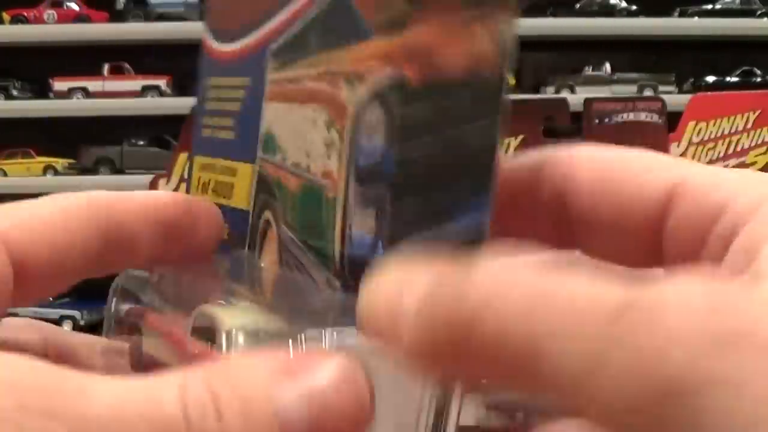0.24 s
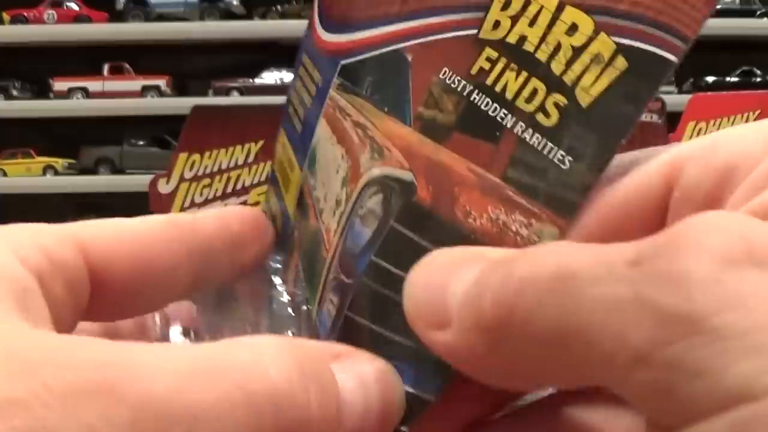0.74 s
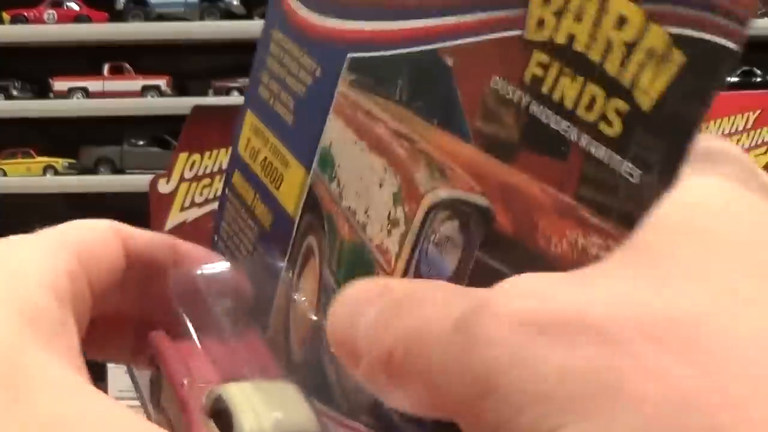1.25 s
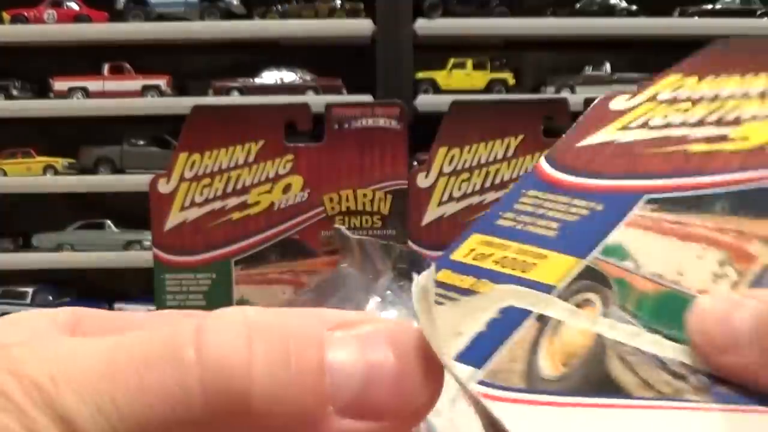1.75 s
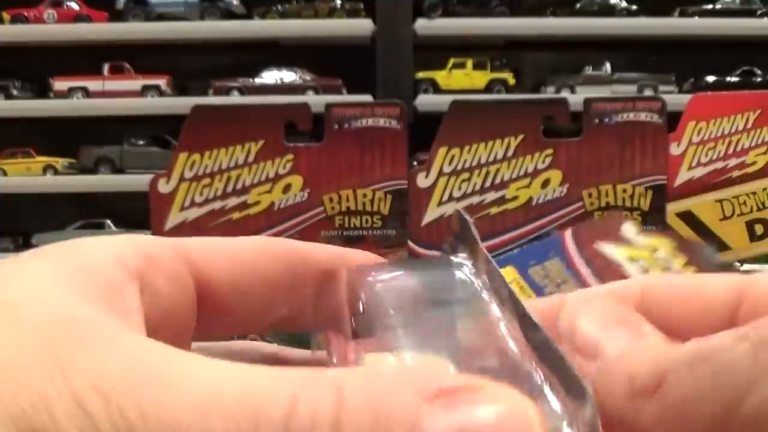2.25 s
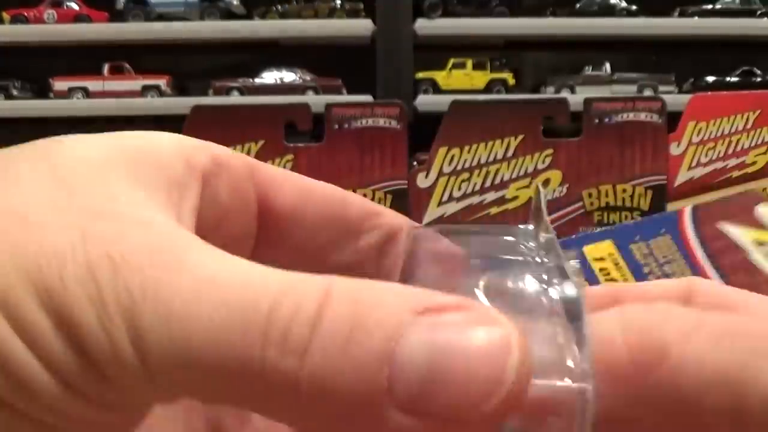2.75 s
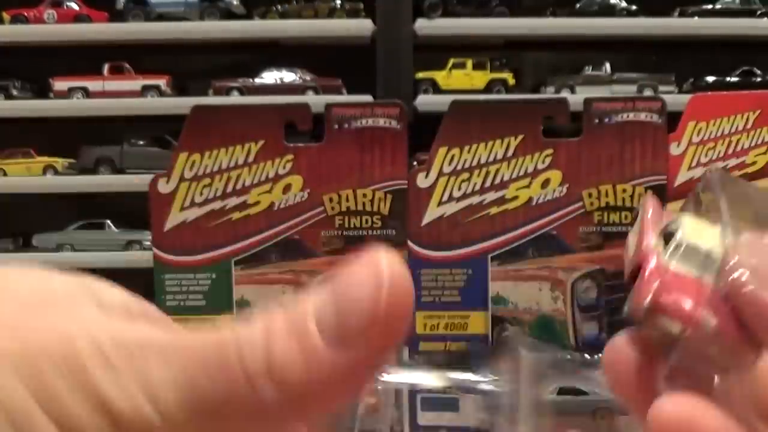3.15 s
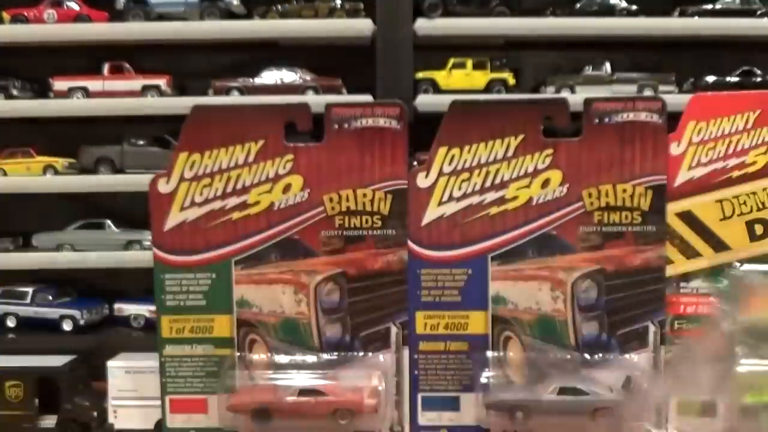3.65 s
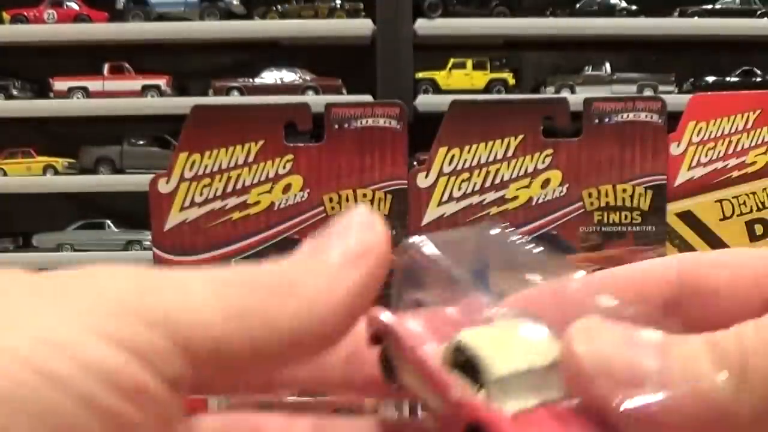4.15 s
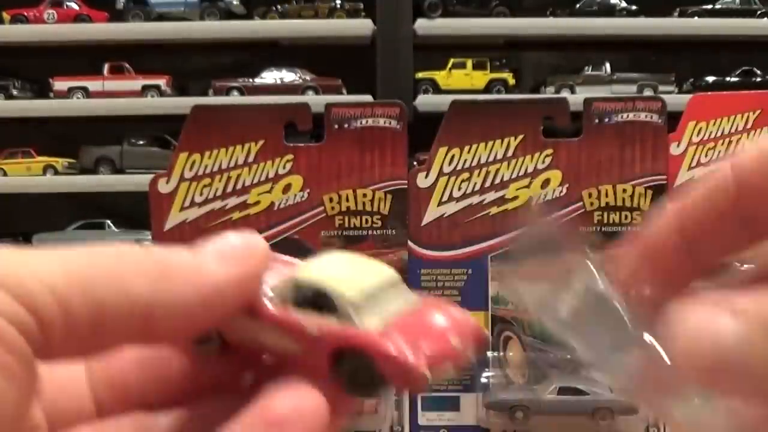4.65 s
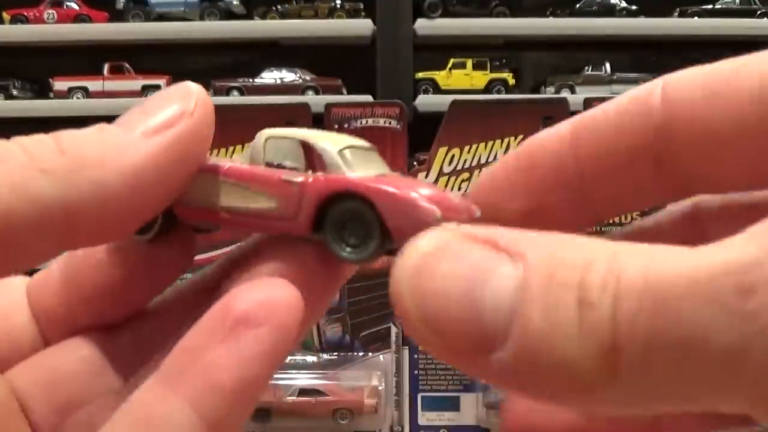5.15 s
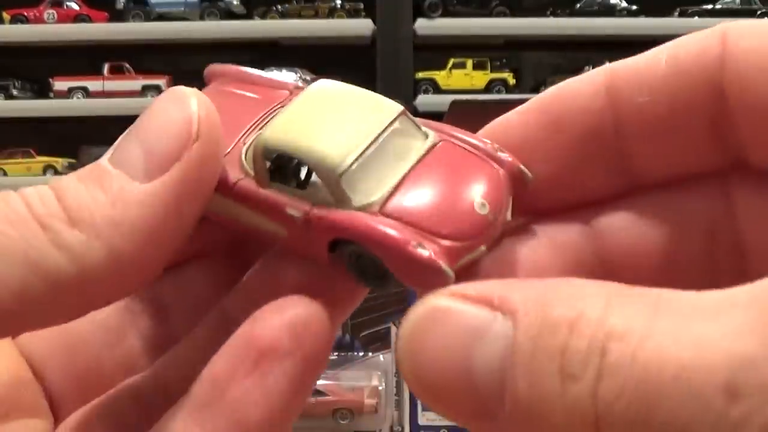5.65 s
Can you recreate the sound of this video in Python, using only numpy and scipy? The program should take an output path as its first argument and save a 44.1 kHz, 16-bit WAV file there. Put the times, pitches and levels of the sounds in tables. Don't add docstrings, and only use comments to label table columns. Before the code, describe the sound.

A plastic blister pack is opened very near the microphone. Soft clicks and ratcheting creaks grow into sharp snaps and a quick tearing burst, then irregular bright crackles and hollow plastic knocks. After a brief lull with tiny metallic ticks, a light plastic tray drops, bounces and rattles to rest. The room is dry, with faint hiss and no speech.

```python
import sys
import numpy as np
from scipy import signal
from scipy.fft import rfft, irfft
from scipy.io import wavfile
from scipy.ndimage import uniform_filter1d

SR = 44100
rng = np.random.default_rng(int(sys.argv[2]) if len(sys.argv) > 2 else 0)


def voltage_ratio(level):
    return 10 ** (np.asarray(level, float) / 20)


def store_pcm(level_fs):
    pcm = np.round(np.clip(level_fs, -1, 1) * 32767).astype(np.int16)
    wavfile.write(sys.argv[1], SR, np.atleast_2d(pcm).T)


N = 260120

# (time [s], peak
# level [dB], treble share [dB])
SNAPS = [(0.1252, -13, -11), (0.2, -16.5, -17), (0.2392, -26, -13), (0.434, -24, -14),
         (0.5433, -14.5, -17), (0.562, -27, 0.5), (0.581, -20.5, -7), (0.5957, -18, -7),
         (0.744, -24, -19), (0.9548, -23.5, 10), (0.9849, -2, -1.5), (1.056, -26, -6),
         (1.0782, -8, -4), (1.1389, -1.5, -1.5), (1.3929, -4.5, -4.5), (1.4104, -12, -10),
         (1.5154, -10, -13), (1.749, -7, -12), (1.7737, -11, -23), (1.8428, -2, 8),
         (1.862, -2.5, -15), (1.8957, -1.5, 15), (1.917, -7, -37), (1.937, -4, -5.5),
         (2.015, -8, -11), (2.063, -15.5, -9), (2.1045, -6.5, -35), (2.1427, -11.5, -4.5),
              (2.264, -1.5, -1), (2.4234, -7, -24), (2.492, -13, 0), (2.606, -9, -20), (2.643, -17.5, -13),
              (2.6957, -9, 0), (2.765, -10.5, -1.5), (2.8505, -8, -7), (2.9196, -4.5, 0.5), (2.9259, -3, 1),
              (2.964, -7.5, -18), (3.13, -1, -7), (3.1494, -10, -5), (3.176, -9, -1.5), (3.262, -9, 3),
              (3.3595, -6.5, 1.5), (3.38, -23, -22), (3.449, -10.5, -3.5), (3.497, -8, -2),
         (3.6244, -31, 6), (3.649, -4, 5), (3.673, -6, 3), (3.714, -7.5, -2), (3.783, -8, -1.5),
              (3.867, -4, -21), (3.936, -7, -12), (3.956, -13, -14), (3.98, -9, -5.5), (4.01, -11.5, -7),
              (4.028, -9.5, -18), (4.0759, -15.5, -7), (4.198, -27, -24), (4.232, -14.5, -23),
              (4.2468, -18, -27), (4.707, -20, -19), (4.7652, -22, -14), (4.807, -2, -13.5),
              (4.9048, -17, -6), (4.959, -17.5, -19), (4.973, -12.5, -9.5), (5.0795, -5, -5),
              (5.2345, -17.5, 0.5)]
# (time [s], peak level [dB])
SEAM_TICKS = [(1.4204, -20), (1.4248, -27), (1.43, -1), (1.44, -5), (1.451, -1), (1.458, -6.5),
              (1.465, -1.5), (1.4695, -20), (1.4735, 1), (1.484, -7.5), (1.4896, -4), (1.513, -5),
              (1.5474, -5), (1.5523, -10), (1.5582, -5), (1.5694, -5), (1.5745, -5), (1.5797, -12),
              (1.586, -7), (1.6097, -5), (1.6147, -4), (1.626, -12), (1.6344, -10), (1.642, -3),
              (1.647, -9), (1.654, -4), (1.663, -4), (1.6744, -8), (1.683, -5), (1.692, -11), (1.6966, -6),
              (1.7047, -7), (1.7147, -8), (1.7244, -35), (1.737, -13)]
SNAP_T60_S, SEAM_T60_S = 0.021, 0.006
TAUT_FOLD_HZ, LOOSE_FOLD_HZ, LOOSE_S = 4670, 3170, 0.9

# (time [s], peak level [dB], panel pitch [Hz])
SHELL_POPS = [(0.123, -17.5, 830), (0.239, -16, 667), (0.269, -26, 730), (0.6, -15, 723), (0.976, -12, 787),
              (1.07, -11.5, 680), (1.299, -20.5, 1140), (1.324, -16.5, 598), (1.3913, -8, 1800),
              (1.422, -11, 720), (1.471, -14, 735), (1.528, -11.5, 670), (1.663, -16, 690),
              (1.686, -14, 630), (1.747, -18.5, 710), (1.768, -17, 690), (1.791, -22, 615),
              (1.717, -4, 624), (1.844, -12, 680), (1.884, -16.5, 619), (1.919, -19.5, 713),
              (1.939, -17.5, 750), (2.015, -23, 1270), (2.065, -17, 610), (2.105, -12, 552),
              (2.42, -13.5, 830), (2.562, -20, 706), (2.608, -14.5, 1470), (2.694, -17, 690),
              (2.762, -14, 683), (2.869, -17.5, 1340), (2.961, -18.5, 667), (3.058, -24.5, 620)]
# (time [s], peak level [dB], panel pitch [Hz])
TRAY_POPS = [(3.152, -13.5, 1120), (3.178, -18, 1610), (3.228, -15, 1120), (3.237, -4, 1120),
             (3.266, -12, 1110), (3.284, -13.5, 1130), (3.33, -16.5, 1000), (3.35, -11, 616),
             (3.621, -19.5, 1314), (3.709, -23, 1360), (3.799, -4.5, 1422), (3.819, -12, 590),
             (3.869, -8, 1320), (3.956, -9.5, 540), (4.078, -13.5, 1486), (4.136, -14.5, 1430),
             (4.197, -28, 1540), (4.806, -7, 1520), (4.866, -20, 575), (4.9049, -7, 1112),
             (4.972, -9.5, 1424), (5.08, -6.5, 1270), (5.129, -17.5, 1500), (5.547, -45.5, 512)]
POP_T60_S, POP_PITCH_LAW, POP_STRENGTH_LAW = 0.064, 0.0034, 0.11
TRAY_S = 3.15

# (time [s], peak level [dB], crease pitch [Hz])
PULL_CREASES = [(1.7667, -15, 3750), (1.7725, -19, 3000), (1.7826, -13, 3120), (1.79, -7, 4130),
                (1.7995, -10, 3880), (1.8173, -15, 3770), (1.827, -7.5, 3190), (1.8333, -8, 4130),
                (1.8426, -7, 2900), (1.863, -13, 3020), (1.882, -16, 2780), (1.8956, -5, 2480),
                (1.9193, -5, 3250), (1.939, -14, 2350), (2.0141, -0.5, 3180), (2.0628, -10, 3400),
                (2.1043, -15, 4680), (2.1438, -11.5, 4330), (2.244, -19, 5660), (2.264, -9.5, 4300),
                (2.337, -19.5, 3230), (2.425, -8.5, 2320), (2.4467, -14, 4200), (2.492, -16, 3650),
                (2.505, -15, 2270), (2.573, -12, 3100), (2.6082, -0.5, 3100), (2.642, -12, 3560),
                (2.6968, -12, 4030), (2.7644, -17, 2420), (2.7996, -7, 3120), (2.8257, -12.5, 2800),
                (2.8516, -12, 2960), (2.922, -9.5, 3700), (2.9646, -11, 3600), (2.9833, -10, 2950),
                (3.075, -19.5, 3030), (3.0916, -14, 2980), (3.118, -15, 3340), (3.1305, -22, 3460),
                (3.1789, -3.5, 3500)]
# (time [s], peak level [dB], crease pitch [Hz])
TRAY_CREASES = [(3.231, -26, 1380), (3.2622, -10, 4000), (3.2994, -14, 1400), (3.3334, -10.5, 1430),
                (3.354, -9.5, 1960), (3.376, -17, 1650), (3.3916, -10.5, 1990), (3.4492, -19, 2530),
                (3.4576, -14, 3060), (3.4985, -16, 5400), (3.625, -5.5, 2865), (3.6516, -11.5, 2590),
                (3.6776, -7, 3170), (3.708, -21, 1800), (3.7602, -13, 1580), (3.774, -12, 1500),
                (3.784, -5.5, 1370), (3.802, -6.5, 1424), (3.8213, -5.5, 1880), (3.835, -5, 1660),
                (3.852, -5.5, 1620), (3.8683, -23, 1520), (3.9047, -14, 1600), (3.9368, -10.5, 3140),
                (3.9601, -7, 1990), (3.972, -15, 1360), (3.987, -16, 1720), (4.0115, -12, 1400),
                (4.0271, -11, 4760), (4.052, -12, 5870), (4.08, -24, 1550), (4.1414, -19, 1380),
                (4.1973, -13.5, 2630), (4.2129, -17, 1580), (4.231, -7, 2620), (4.2477, -16.5, 1530),]
# (time [s], peak level [dB], pitch [Hz])
BOUNCES = [(4.809, -1, 2700), (4.8143, -4, 2670), (4.8218, -2, 2720), (4.8326, -4, 1017),
           (4.8436, -4.5, 1640), (4.867, -12, 910), (4.8737, -14, 930), (4.9068, -4.5, 1740),
           (4.911, -7, 1080), (4.9202, -9.5, 2600), (4.9345, -43.5, 2710), (4.9593, -21, 950),
           (4.9757, -13, 1496), (5.081, -18, 1210), (5.087, -26, 1260), (5.132, -25, 1470),
           (5.1436, -19, 2280)]
CREASE_CYCLES, CREASE_LONGEST_S, CREASE_DB = 54, 0.04, -2

# (frequency [Hz], response [dB])
FIBRES = [(2940, -41.5), (5000, -8), (6710, -2), (8840, 8.5), (10200, 9.5), (12200, -8.5), (16000, -13.5),
          (17000, -63)]
# (frequency [Hz], response [dB])
SHEET = [(940, -33.5), (1600, -2), (1860, -4.5), (2040, -21.5), (2890, -1.5), (5020, -6), (7000, -11),
         (9100, -7.5), (15400, -120)]
# (frequency [Hz], response [dB])
SHELL = [(120, -34), (200, -17), (455, -12.5), (628, -1.5), (831, -11), (1070, -5), (1210, -9.5),
         (2400, -13), (3300, -39.5), (6000, -67)]
# (frequency [Hz], response [dB])
TRAY = [(120, -53.5), (200, -10.5), (432, -7), (548, 4), (831, -1.5), (1200, -4), (1340, 1.5), (2400, -6),
        (3300, -34), (6000, -64)]
# (frequency [Hz], response [dB])
BUMPS = [(15, -49.5), (25, -18), (80, -12), (165, -4.5), (330, -4), (430, -16), (660, -92)]
# (time [s], crackle level [dB], brightness [dB])
STRAIN = [(0, -62, -16), (.33, -66, 1), (.5, -52.5, -7), (.82, -50, -0.5), (.93, -42.5, 14.5),
          (1.05, -43.5, -3), (1.28, -43, 3.5), (1.6, -34.5, -3), (1.93, -31.5, 4), (2.03, -48, 0),
          (2.5, -35.5, -5), (3.03, -46.5, -2.5), (3.42, -47, -3), (3.7, -39.5, 3.5), (3.95, -33.5, -17),
          (4.19, -53, -19), (4.55, -60.5, 2), (5.39, -66.5, -4.5)]
# (start [s], hold [s], level [dB], brightness [dB])
SQUEEZES = [(0.134, 0.024, -52, 6), (0.194, 0.06, -46, -5), (0.436, 0.035, -54, 16),
            (0.707, 0.043, -62, 30), (0.966, 0.0056, -25, 9.5), (1.126, 0.032, -34, 6),
            (1.42, 0.19, -29, 10.5), (1.519, 0.062, -25.5, -4.5), (1.724, 0.087, -32, 14),
            (2.093, 0.067, -39, -11.5), (2.27, 0.15, -51.5, 18), (2.422, 0.0072, -25, 7),
            (2.562, 0.057, -35.5, 5), (2.785, 0.042, -44.5, 9.5), (2.903, 0.0059, -32, -6),
            (2.975, 0.015, -33.5, -13), (3.063, 0.13, -41, -10), (3.241, 0.066, -32, -3),
            (3.364, 0.029, -28.5, -1.5), (3.618, 0.027, -34, 4), (3.781, 0.055, -30, 5),
            (4.212, 0.022, -37, -7), (4.328, 0.046, -50, 4), (4.71, 0.031, -50, -7),
            (3.66, 0.0049, -36, -2), (0.66, 0.01, -44, 8), (1.344, 0.052, -35, -5.5),
            (4.113, 0.027, -35, -18), (5.119, 0.056, -56, 5)]
# (start [s], hold [s], level [dB], brightness [dB])
DROPS = [
    (4.809, 0.0053, -24, -12.5),
    (4.902, 0.0063, -40, -17),
    (4.963, 0.048, -41, -14),
    (5.076, 0.031, -39, -21.5),
]
SWELL_DB_PER_S, DROP_DB_PER_S = 606.5, 9000
FIBRE_FADE_DB_PER_S, SHEET_FADE_DB_PER_S, SHELL_FADE_DB_PER_S = 343, 287, 230.5
# (middle [s], half length [s], depth [dB])
LULLS = [
    (0.685, 0.016, -13),
    (2.216, 0.022, -9.5),
    (2.397, 0.033, -12.5),
    (2.73, 0.03, -6.5),
    (3.041, 0.035, -10),
    (3.61, 0.012, -5),
    (4.323, 0.021, -5.5),
    (4.8, 0.0097, -7),
]
# (time [s], gain [dB])
SHEET_SHARE = [
    (.45, 6),
    (.6, -4),
    (.9, -10),
    (1.3, 0.5),
    (4.25, 2.6),
    (4.35, 6),
    (4.75, 6.5),
    (4.8, 5.5),
]
# (time [s], bump level [dB])
GRIP = [(0, -73), (0.12, -48), (0.14, -34), (0.22, -52.5), (0.9, -64), (1.05, -58), (2.3, -63), (2.45, -57),
        (2.8, -73), (3.3, -38.5), (3.55, -49.5), (3.9, -40.5), (4.2, -50), (4.4, -76), (4.9, -48),
        (5.4, -84)]
RAREST = 0.012

# (time [s], peak level [dB])
RATCHET = [(0.3603, -45), (0.3775, -44), (0.3844, -49), (0.3926, -41.5), (0.4393, -31), (0.545, -29.5),
           (0.5623, -25), (0.5816, -23.5), (0.5975, -25), (0.637, -42), (0.6458, -31), (0.7242, -35),
           (0.7448, -24), (0.7811, -35.5), (0.7979, -36), (0.8167, -42), (0.851, -30.5), (0.8665, -49),
           (0.8908, -41), (0.9004, -31), (0.9118, -48), (0.9321, -37),]
# (frequency [Hz], level [dB], T60 [s])
FLAP = [(750, -5, 0.037), (1230, -5, 0.031), (1740, -0.5, 0.032), (1890, 1.5, 0.015), (4000, 2, 0.0077),
        (5410, 5.5, 0.0096)]
# (start [s], end [s], slip rate [1/s], peak level [dB], pitch [Hz])
JUDDER = (4.61, 4.7, 64, -41, 2600)
JUDDER_RISE_DB_PER_S = 188

# (time [s], peak level [dB], second ring [dB])
AXLES = [
    (4.379, -26.5, 2),
    (4.386, -34, 1),
    (4.41, -25, 8),
    (4.4747, -26.5, -12),
    (4.495, -30.5, 23),
    (4.589, -27, -3),
]
# (frequency [Hz], level [dB])
AXLE_MODES = [(4520, 12), (5310, -1), (5670, -6), (10670, 10), (2480, -1), (720, -2)]
# (time [s], peak level [dB])
SHIFTS = [
    (0.13, -29),
    (0.143, -43),
    (0.159, -34),
    (0.206, -25.5),
    (0.243, -40),
    (0.266, -32),
]
# (frequency [Hz], level [dB])
BODY_MODES = [(2470, 1), (3300, -15), (4640, -4), (5300, -3)]
AXLE_T60_S, BODY_T60_S = 0.022, 0.027

# (time [s], peak level [dB], pitch [Hz])
THUDS = [(.122, -30, 310), (0.194, -32.5, 280), (0.552, -40.5, 202), (.979, -22, 330), (1.064, -33, 307),
         (1.299, -40, 160), (1.525, -36, 307), (1.817, -24, 291), (2.065, -33, 176), (2.424, -28, 220),
         (2.752, -28.5, 320), (2.98, -34, 220), (3.238, -11, 390), (3.263, -22, 201), (3.351, -20.5, 246),
         (3.623, -32.5, 180), (3.932, -34, 193), (4.826, -29, 204)]
THUD_CYCLES = 7

# (frequency [Hz], side re mid [dB])
PORTS = [(60, -32), (110, -21), (200, -22), (380, -16), (700, -16.5), (1290, -9.5), (2380, -10),
         (4400, -11.5), (8120, -13), (15000, -29)]
# (time [s], left minus right [dB])
SIDEWAYS = [
    (0, 0),
    (2.9, -1),
    (3.2, 0.9),
    (4.1, -2),
    (5.1, -2.5),
    (5.4, -1),
]
ROOM_T60_S, ROOM_DB, ROOM_HZ = 0.065, -12, 4900
# (frequency [Hz], level [dB])
AIR = [(15, -52.5), (25, -7.5), (163, -10.5), (296, -11.5), (339, -9.5), (746, -14), (809, -14.5),
       (1390, -17.5), (2530, -17.5), (15200, -26), (16500, -25.5)]
# (frequency [Hz], correlation [0-1])
AIR_ALIKE = [(60, 1), (130, 0.8), (290, 0.43), (640, 0), (1410, 0.01), (3100, 0.4), (6820, 0.84),
             (15000, 0.95)]
AIR_DB = -59.5
TOP_HZ = 15950


def fold_snaps():
    out, t = np.zeros(N), np.arange(3000) / SR
    folds = [(*row, SNAP_T60_S) for row in SNAPS]
    for s, db, treble_db, t60 in folds + seam_snaps():
        slips, after = rng.standard_normal((2, len(t)))
        grain = uniform_filter1d(np.abs(after) ** 4, size=24) / 3
        crack = 2.53 * np.exp(-t / 0.00038)
        body = voltage_ratio(-60 * t / (1.06 * t60))
        tail = 0.5 * grain * voltage_ratio(-60 * t / (1.77 * t60))
        burst = slips * (crack + body + tail) * np.minimum(t / 0.000092, 1)
        share = np.clip(voltage_ratio(treble_db), 0.03, 0.97)
        treble = colour(burst, bent(FIBRES, 1.124 ** after[0]))
        add(out, s, treble, db - 0.5 + 20 * np.log10(share))
        fold_hz = (LOOSE_FOLD_HZ if s > LOOSE_S else TAUT_FOLD_HZ) * 1.33 ** after[1]
        ring = np.convolve(burst, modes(t[:300], fold_hz, 0.0012, [], spread=0))[:len(t)]
        dull = unit(colour(burst, SHEET)) + 0.36 * unit(ring)
        add(out, s, dull, db - 1.0 + 10 * np.log10(1 - share ** 2))
    return highpass(out, 2, 500)


def seam_snaps():
    return [(s, db + 1.5, -1.2, SEAM_T60_S) for s, db in SEAM_TICKS]


def panel_pops():
    out, t = np.zeros(N), np.arange(3000) / SR
    for s, db, hz in SHELL_POPS + TRAY_POPS:
        chance, jerks = rng.random(5), rng.standard_normal(len(t))
        t60 = POP_T60_S * (hz / 1e3) ** POP_PITCH_LAW * voltage_ratio(db + 9.5) ** POP_STRENGTH_LAW
        ring = modes(t, hz, 0.45 * t60, chance, spread=0.713)
        add(out, s, ring * (1 - np.exp(-(t / 0.0023) ** 2)), db - 4.5)
        rattle = jerks * voltage_ratio(-60 * t / (1.3 * t60))
        add(out, s, colour(rattle, SHELL if s < TRAY_S else TRAY), db - 9.0)
    return highpass(out, 3, 330)


def crease_flicks():
    out, t = np.zeros(N), np.arange(1500) / SR
    soften = np.hanning(8)
    for s, db, hz in PULL_CREASES + TRAY_CREASES + BOUNCES:
        chance, jerks = rng.random(4), rng.standard_normal(len(t))
        ring = modes(t, hz, min(CREASE_CYCLES / hz, CREASE_LONGEST_S), chance, spread=0.6)
        click = jerks * np.exp(-t / 0.0003)
        add(out, s, np.convolve(ring, soften) / 5.7 + np.convolve(click, soften) / 2, db + CREASE_DB)
    return highpass(out, 2, 700)


def rustle(t, fibres, sheet, shell, bumps):
    shared = unit(crackle(per_s=600, scatter_db=3.2, grain_s=0.0018))
    fine = unit(crackle(per_s=3200, scatter_db=7.5, grain_s=0.0011))
    coarse = unit(crackle(per_s=200, scatter_db=5.0, grain_s=0.0028))
    soft = unit(crackle(per_s=270, scatter_db=7.5, grain_s=0.012))

    def hollow(body):
        return unit(0.85 * colour(shared, body) + 0.46 * colour(coarse + fine, bent(body, 1.18)))

    treble = 0.3 * colour(shared, bent(FIBRES, 1.25)) + 0.94 * colour(fine, bent(FIBRES, 0.97))
    flat = colour(0.87 * shared + 0.74 * fine, SHEET) + 0.63 * colour(coarse, bent(SHEET, 1.255))
    body = np.where(t < TRAY_S, hollow(SHELL), hollow(TRAY))
    bumping = colour(0.49 * coarse + 0.74 * soft, BUMPS)
    return fibres * unit(treble) + sheet * unit(flat) + shell * body + bumps * unit(bumping)


def crackle(per_s, scatter_db, grain_s):
    chance = rng.random((2, N))
    slips = (chance[0] < per_s / SR) * voltage_ratio(-scatter_db * np.log(chance[1] + RAREST))
    fade = np.exp(-1 / (grain_s * SR))
    return signal.lfilter([1], [1, -fade], slips) * rng.standard_normal(N)


def hands(t):
    level, bright = curves(STRAIN, t)
    hush = sum(db * np.exp(-((t - s) / half) ** 2) for s, half, db in LULLS)
    moves = [(*row, SWELL_DB_PER_S) for row in SQUEEZES] + [(*row, DROP_DB_PER_S) for row in DROPS]
    gains = []
    for lean, fade in [(0.73, FIBRE_FADE_DB_PER_S), (0.26, SHEET_FADE_DB_PER_S), (-0.34, SHELL_FADE_DB_PER_S)]:
        power = voltage_ratio(level + lean * bright) ** 2
        for start, hold, db, bright_db, swell in moves:
            under = swell * np.maximum(start - t, 0) + fade * np.maximum(t - start - hold, 0)
            power = power + voltage_ratio(db + lean * bright_db - under) ** 2
        gains.append(np.sqrt(power) * voltage_ratio(hush))
    return gains[0], gains[1] * voltage_ratio(curves(SHEET_SHARE, t)[0]), gains[2]


def stick_slip_ticks():
    out, t = np.zeros(N), np.arange(1200) / SR
    for s, db in RATCHET:
        jerks = rng.standard_normal(40)
        ring = 0
        for (hz, mode_db, t60), c in zip(FLAP, jerks[::-1]):
            decay = voltage_ratio(mode_db + 2 * c - 60 * t / t60)
            ring = ring + decay * np.sin(2 * np.pi * hz * (1 + 0.019 * c) * t)
        add(out, s, np.convolve(ring, np.abs(jerks) * np.exp(-t[:40] / 0.0001)), db + 8.0)
        add(out, s, np.diff(jerks) * np.hanning(39), db - 5.0)
    start, end, per_s, db, hz = JUDDER
    for s in np.arange(start, end, 1 / per_s):
        chance, jerks = rng.random(4), rng.standard_normal(400)
        ring = modes(t, hz, 0.0086, chance, spread=0.59) + 0.25 * modes(t, 0.274 * hz, 0.027, [], spread=0)
        rise_db = JUDDER_RISE_DB_PER_S * min(s - start, 0.05)
        add(out, s, np.convolve(ring, jerks * np.hanning(400) ** 2), db + rise_db)
    return highpass(out, 2, 500)


def metal_toy():
    out, t = np.zeros(N), np.arange(4000) / SR
    hits = [(s, db, lean_db, AXLE_MODES, AXLE_T60_S) for s, db, lean_db in AXLES]
    hits += [(s, db, 0, BODY_MODES, BODY_T60_S) for s, db in SHIFTS]
    for s, db, lean_db, rings, t60 in hits:
        jerks = rng.standard_normal(300)
        ring = 0
        for k, ((hz, mode_db), b) in enumerate(zip(rings, jerks)):
            decay = voltage_ratio(mode_db + lean_db * (k == 1) - 60 * t / t60)
            ring = ring + decay * np.sin(2 * np.pi * hz * (1 + 0.008 * b) * t + np.pi * b)
        add(out, s, ring * (1 - np.exp(-t / 0.0015)), db - 1.0)
        add(out, s, np.diff(jerks) * np.exp(-t[1:300] / 0.001), db - 9.0)
    return out


def thuds():
    out, t = np.zeros(N), np.arange(5000) / SR
    for s, db, hz in THUDS:
        ring = modes(t, hz, THUD_CYCLES / hz, rng.random(6), spread=0.8)
        add(out, s, ring * np.minimum(t * hz, 1), db)
    return highpass(out, 2, 130)


def modes(t, hz, t60, chance, spread):
    ring = np.sin(2 * np.pi * hz * t) * voltage_ratio(-60 * t / t60)
    for u in chance:
        near_hz = hz * 2 ** (spread * (2 * u - 1))
        ring = ring + 0.32 * np.sin(2 * np.pi * near_hz * t) * voltage_ratio(-60 * t / (0.72 * t60))
    return ring


def bent(table, stretch):
    return [(hz * stretch, db) for hz, db in table]


def colour(x, table):
    size = 2 ** 11
    cep = irfft(np.log(voltage_ratio(np.maximum(on_bins(table, size), -80))), size)
    cep[1:size // 2] *= 2
    cep[size // 2 + 1:] = 0
    return signal.fftconvolve(x, irfft(np.exp(rfft(cep)), size))[:len(x)]


def on_bins(table, size):
    hz, value = np.transpose(table)
    return np.interp(np.log(np.fft.rfftfreq(size, 1 / SR) + 1), np.log(hz + 1), value)


def curves(table, t):
    s, *columns = np.transpose(table)
    return [np.interp(t, s, c) for c in columns]


def unit(x):
    return x / np.sqrt(np.mean(x ** 2))


def highpass(x, order, hz):
    return signal.lfilter(*signal.butter(order, hz, "high", fs=SR), x)


def add(track, s, sound, db):
    i = int(s * SR)
    track[i:i + len(sound)] += (sound * voltage_ratio(db) / np.abs(sound).max())[:N - i]


def ports(x, pan_db):
    side = colour(echoes(x, 0.012, 0.00012, count=14), PORTS) * voltage_ratio(-4.0)
    return np.array([x + side, x - side]) * voltage_ratio(np.array([pan_db, -pan_db]) / 2)


def room(x):
    tail = echoes(x, ROOM_T60_S / np.log(1000), 0.00024, count=14)
    return voltage_ratio(ROOM_DB) * signal.lfilter(*signal.butter(1, ROOM_HZ, fs=SR), tail)


def echoes(x, decay_s, onset_s, count):
    t, out = np.arange(6000) / SR, np.zeros(N)
    place = np.arange(N) * count / N
    for k in range(count + 1):
        tail = rng.standard_normal(len(t)) * np.exp(-t / decay_s) * np.minimum(t / onset_s, 1)
        part = x * np.sqrt(np.maximum(1 - np.abs(place - k), 0))
        out = out + signal.oaconvolve(part, tail / np.sqrt(np.sum(tail ** 2)))[:N]
    return out


def air():
    mid, side = rfft(rng.standard_normal((2, N))) * voltage_ratio(on_bins(AIR, N))
    alike = np.clip(on_bins(AIR_ALIKE, N), -0.99, 0.99)
    mid = irfft(mid, N)
    side = irfft(side * np.sqrt((1 - alike) / (1 + alike)), N)
    return np.array([mid + side, mid - side]) * voltage_ratio(AIR_DB) / np.std(mid)


def scene():
    t = np.arange(N) / SR
    fibres, sheet, shell = (np.repeat(g, 32)[:N] for g in hands(t[::32]))
    bumps = voltage_ratio(curves(GRIP, t)[0] - 3.0) + voltage_ratio(-22.0) * shell
    pack = fold_snaps() + panel_pops() + thuds() + stick_slip_ticks() + crease_flicks() + metal_toy()
    pack = pack + rustle(t, fibres, sheet, shell, bumps) * (t < STRAIN[-1][0])
    return ports(pack + room(pack), curves(SIDEWAYS, t)[0]) + air()


def low_pass(x):
    return signal.sosfilt(signal.butter(12, 16970, fs=SR, output="sos"), x)


def record(dry):
    top = signal.ellip(8, 0.2, 60, TOP_HZ, fs=SR, output="sos")
    rounded = np.tanh(1.346 * dry) / 1.579
    return low_pass(signal.sosfilt(top, rounded))


dry = scene()
out = record(dry)
store_pcm(out)
```